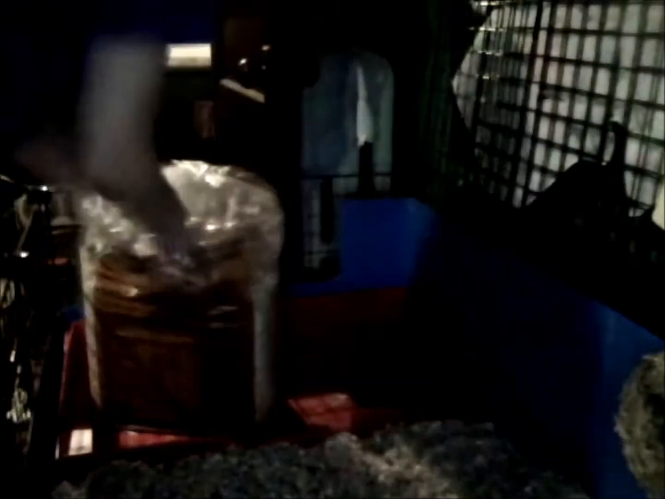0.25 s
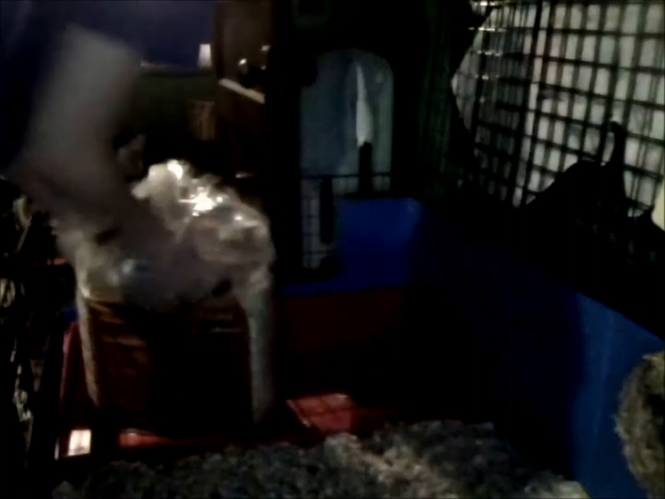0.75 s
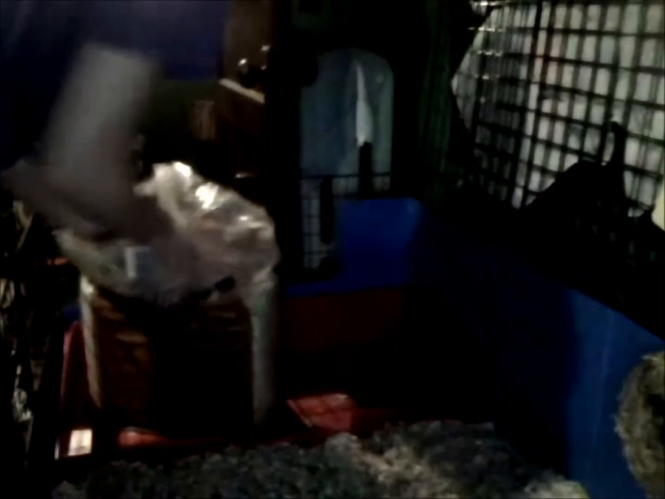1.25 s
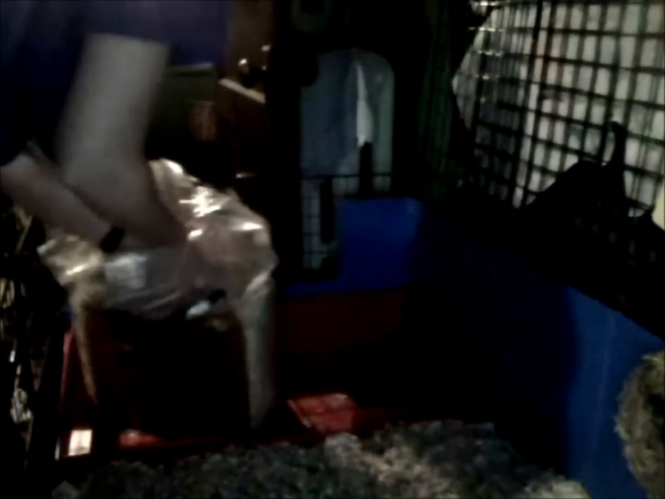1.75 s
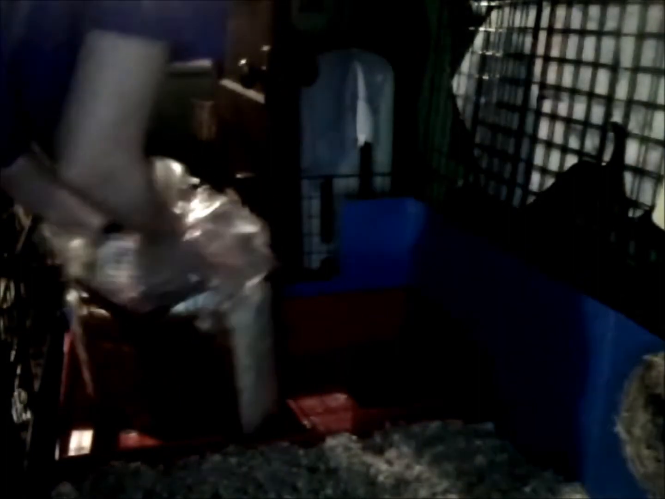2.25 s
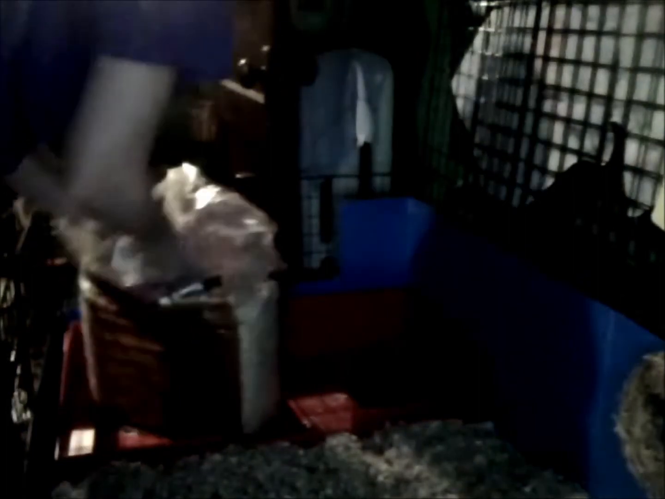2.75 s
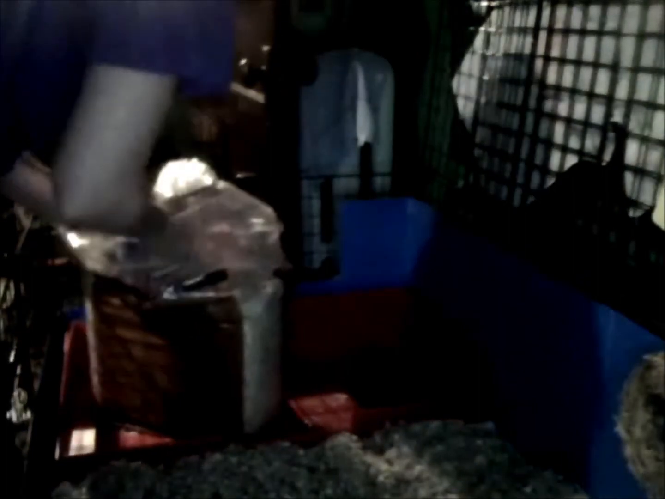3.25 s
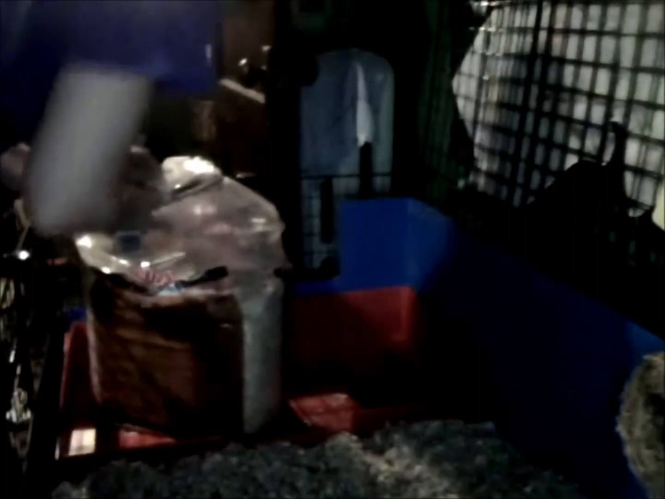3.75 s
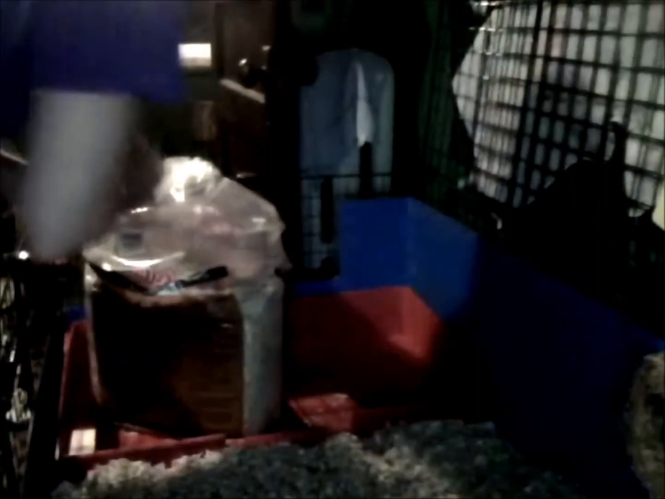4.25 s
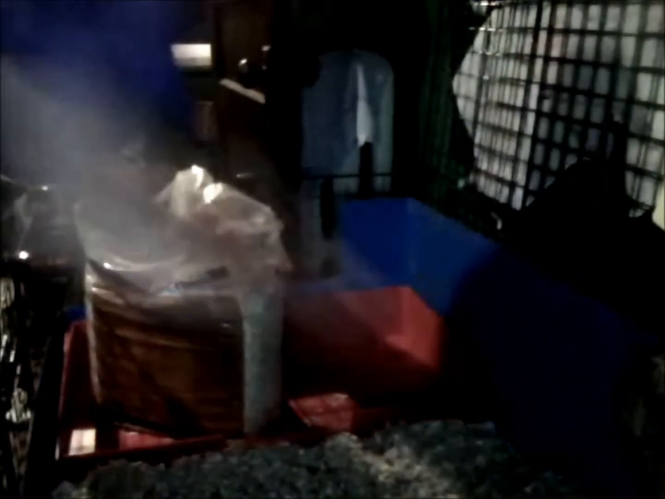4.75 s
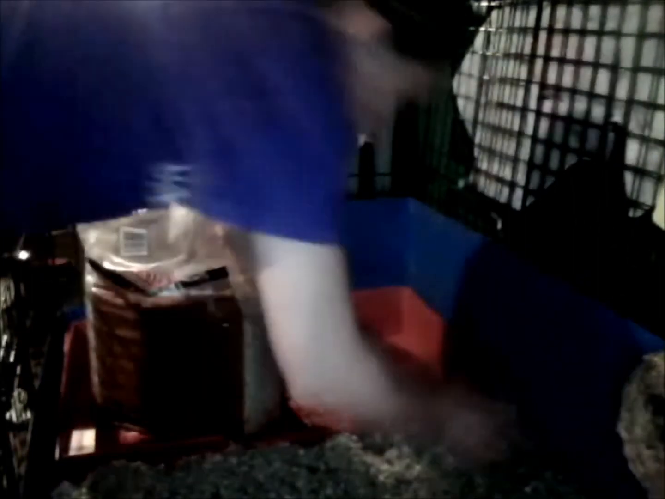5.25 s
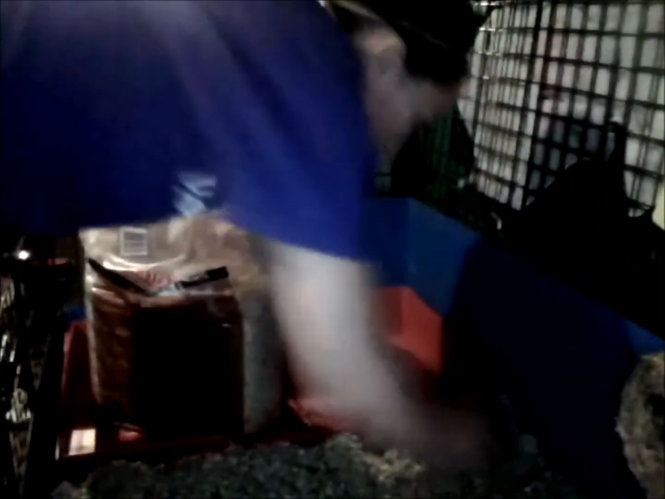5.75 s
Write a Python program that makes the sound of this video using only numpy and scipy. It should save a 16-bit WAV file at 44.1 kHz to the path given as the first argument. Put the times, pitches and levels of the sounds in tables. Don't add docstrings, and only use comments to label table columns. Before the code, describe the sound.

Dry bedding crackles under fingers at once, with a soft low thump of the sack and crisp splinter snaps, loudest at half a second. After 0.8 seconds only sparse faint ticks, slight rustles and a few plastic pops stand over a distant indoor hum. One brief cluster of crunch and hollow knock comes near five seconds. Close, dry, with the highest treble missing.

```python
import sys
import numpy as np
from scipy import signal
from scipy.fft import rfft, irfft
from scipy.io import wavfile
from scipy.ndimage import uniform_filter1d

SR = 44100
rng = np.random.default_rng(int(sys.argv[2]) if len(sys.argv) > 2 else 0)


def dump(signal):
    limited = np.clip(np.atleast_2d(signal).T, -1, 1)
    pcm = np.round(limited * 32767).astype(np.int16)
    wavfile.write(sys.argv[1], SR, pcm)


def linear_from_db(decibels):
    return 10 ** (np.asarray(decibels, float) / 20)


N = 264114
TIME = np.arange(N) / SR

# crest t/s, rustle level/dB, reach/s, heap body rel. level/dB
STROKES = [(.05, -56.5, .2, 1.5), (.3, -44, 0.028, -6), (.34, -47, 0.029, -20), (.485, -38.5, 0.019, -24.5),
           (0.534, -35.5, 0.039, -6), (0.586, -36.5, .025, -20), (.69, -45, .04, -4),
           (.745, -69.5, 0.012, -9), (.85, -60.5, 0.12, -10), (1.1, -66, .1, -17), (1.27, -65, 0.1, 1.5),
           (1.65, -58, 0.097, -4.5), (1.93, -59.5, 0.11, -2.5), (2.35, -63.5, 0.075, 0),
           (2.8, -69.5, .15, -5), (3.25, -70.5, 0.12, -15), (3.56, -65.5, .04, -13.5),
           (3.95, -81, 0.1, -12), (4.23, -66, 0.017, 1), (4.35, -69, 0.12, -2.5), (4.87, -76.5, 0.091, -13),
           (5.08, -57, 0.026, 1.5), (5.16, -65, 0.07, 4.5), (5.355, -63, 0.053, 3),
           (5.49, -63.5, 0.038, -14), (5.7, -62, .02, -7), (5.74, -55.5, 0.022, -9),
           (5.84, -59, 0.033, -11), (5.99, -64.5, 0.036, -13.5)]
# f/Hz, density level/dB per Hz
SLIP_COLOUR = [(700, -25), (1300, 0.5), (2000, 1), (2800, 1.5), (4200, 1), (5600, -0.5), (7000, -2),
               (10000, 0.5)]
# f/Hz, density level/dB per Hz
HEAP_COLOUR = [(40, -28.5), (70, -4), (170, -3.5), (350, -0.5), (700, -1), (1000, 2.5), (1400, -5.5),
               (2200, -4), (3200, -23)]
# crest t/s, level/dB, centre f/Hz, heap body rel. level/dB, squeeze/s
CRUNCHES = [(0.0313, -36.5, 3200, -2.5, .001), (0.036, -35.5, 2860, 4.5, .0044),
            (.097, -36.5, 2980, -7.5, .0063), (.123, -30, 2500, 0.5, .004),
            (.135, -33.5, 4000, -4.5, .0046), (.196, -32.5, 5130, -16.5, .008),
            (.217, -42, 3500, -15, .003), (.348, -39.5, 4020, -2.5, .006), (.393, -33, 4830, -17, .032),
            (.418, -43, 4000, -18, .005), (0.456, -46, 3500, -26.5, .003), (.516, -33, 4600, -5, .026),
            (0.546, -45, 4480, 1.5, .005), (.603, -36, 3500, -14.5, 0.0088), (0.652, -36, 4820, -10, .004),
            (5.095, -32, 2630, -5.5, 0.011), (5.104, -28.5, 2200, -2, .005),
            (5.118, -33, 3500, -2.5, .0063), (5.135, -43.5, 2980, -3.5, .004),
            (5.162, -52, 4500, 0.5, 0.0067), (5.192, -51.5, 2740, -7, .0052)]
# t/s, peak level/dB, ring f/Hz, body rel. level/dB, length/s
LOUD_SNAPS = [(0.0273, -19, 3370, -13, 0.003), (0.0955, -25, 2020, -9, 0.0022),
              (.12, -28, 2910, 4, 0.00073), (0.131, -19, 6100, -11.5, .00068),
              (.19, -15.5, 4400, -32, .0023), (.2, -25, 4200, -27, 0.00093),
              (0.342, -27.5, 1290, -6.5, 0.0025), (.455, -21.5, 2800, -30, .0021),
              (0.4969, -13, 5000, -12.5, .0012), (.4981, -6, 6140, -28, .00087),
              (.5086, -14.5, 5760, -18.5, .0015), (0.5101, -12, 4930, -11, 0.00043),
              (.5985, -15, 4240, -30, 0.00079), (0.624, -26, 2450, -14, 0.0016),
              (0.6503, -11.5, 4720, -16, .00063), (0.7576, -35, 4800, -22, .0014),
              (5.0894, -16, 2620, -2.5, 0.0012), (5.098, -17, 1990, -10.5, 0.00037),
              (5.117, -20, 5940, -8, 0.00092)]
# t/s, peak level/dB, ring f/Hz
FAINT_SNAPS = [(.2618, -41.5, 4750), (.8109, -40.5, 4260), (.9057, -49, 2450), (.9592, -37.5, 2150),
               (1.194, -44, 2040), (1.357, -48, 2820), (1.481, -50, 2540), (1.556, -45, 4070),
               (1.759, -42, 2420), (1.7905, -42, 2690), (1.991, -40.5, 2060), (2.03, -41.5, 2160),
               (2.3237, -44, 4100), (2.358, -42, 5150), (3.4595, -52, 3900), (3.5515, -52, 3000),
               (3.8543, -52, 3090), (3.8736, -53, 2780), (4.2222, -41.5, 2520), (4.292, -41, 2410),
               (4.316, -47, 4400), (4.3698, -49, 5600), (4.4313, -54, 4290), (4.4454, -50, 4920),
               (4.475, -49, 2030), (4.534, -46.5, 2100), (4.9124, -49, 3040), (5.0435, -52, 2050),
               (5.7264, -45, 4530), (5.7833, -47, 2570)]
# (f/Hz, density level/dB per Hz)
FOLD_CLICKS = [
    (0.7176, -20.5, 0.00038, 0.0013, [(1500, -27), (2000, -5.5), (2600, 5.5), (3600, -9), (4800, 1), (6700, -2), (9000, -12.5)]),
    (1.268, -26, 0.0014, 0.0025, [(1700, -23.5), (2600, -0.5), (3200, -11), (4000, 3), (5500, 2), (6600, -2.5), (9000, -22)]),
    (3.487, -24, 0.00013, 0.0018, [(600, -32), (1250, 1), (1800, -25.5), (2400, -2), (2900, -15), (3900, 3.5), (4700, -16), (5600, -5.5), (6900, -2.5), (9000, -8)]),
    (5.2725, -23, 0.0013, 0.002, [(1500, -18), (2150, 3), (3200, -2.5), (4500, -2.5), (5800, -2), (7000, -6.5), (9000, -15)]),
]
# t/s, f/Hz, level/dB, t60/s
POCKETS = [(.1205, 791, -23, 0.038), (.129, 747, -25, 0.023), (.29, 986, -43.5, 0.038),
           (.303, 1000, -37, 0.026), (.345, 1024, -32, .06), (.42, 1880, -35, .02),
           (.5105, 978, -34, 0.016), (.649, 1024, -35, 0.034), (5.089, 900, -27, 0.029),
           (5.101, 153, -33.5, 0.049), (5.104, 800, -23, 0.018)]
# f/Hz, level/dB, t60/s
SACK_MODES = [(214, 2, 0.098), (484, -1, 0.048), (645, -12, 0.067), (840, -20, 0.35)]
# t/s, level/dB
SACK_BLOWS = [
    (0.0278, -32),
    (.006, -43),
    (.019, -40),
    (0.122, -50),
    (.51, -48.5),
    (.6, -43),
]
# f/Hz, density level/dB per Hz
ROOM_COLOUR = [(12, -22.5), (25, -2), (81, -2), (262, -7), (403, -6.5), (500, -6.5), (622, -10.5),
               (760, -8.5), (1000, -14), (1400, -17.5), (2500, -25.5), (7900, -34.5), (8500, -55.5)]
# f/Hz, level/dB
CAMERA_RESPONSE = [(20, -0.5), (6500, -0.5), (7300, -5.5), (8000, -16.5), (8700, -25), (9000, -42),
                   (9300, -80)]

STROKE_EDGE, STROKE_TRAIL = 1.3, 1.05
SETTLING_DB = -81.5
SPRING_BACK_S, SPRING_BACK_SHARE = 0.0031, 1
LOUD_SCATTER_DB, LOUD_BROAD_DB = -11.5, -7
FAINT_BODY_DB, FAINT_LENGTH_S, FAINT_SCATTER_DB, FAINT_BROAD_DB = -14, 0.001, -8, -11
SNAP_SAMPLES, CLICK_SAMPLES, BOOM_SAMPLES = 2600, 1800, 9000
CLICK_LEAD_S = 0.006
ROOM_DB = -55.5


def unit(x):
    return x / np.sqrt(np.mean(x ** 2))


def shape(x, points):
    hz, db = np.transpose(points)
    grid = np.log(np.arange(len(x) // 2 + 1) * SR / len(x) + 1)
    gain = linear_from_db(np.interp(grid, np.log(hz), db, -80, -80))
    return irfft(rfft(x) * gain, len(x))


def colour(x, points):
    return unit(shape(x, points))


def band(x, hz, q):
    b, a = signal.iirpeak(hz, max(q, .3), fs=SR)
    return signal.lfilter(b, a, x)


def walk(rate):
    hold = int(SR / rate)
    steps = np.repeat(rng.standard_normal(N // hold + 1), hold)
    slewed = uniform_filter1d(uniform_filter1d(steps, hold), hold)
    return unit(slewed[:N])


def even(burst):
    lines = rfft(burst)
    power = uniform_filter1d(abs(lines) ** 2, size=17)
    return irfft(lines / np.sqrt(power), len(burst))


def slips(per_s, spread_db, smear_s):
    happens = rng.random(N) < per_s / SR
    sizes = happens * linear_from_db(spread_db * rng.exponential(size=N).clip(0, 3.2))
    burst = signal.lfilter([1], [1, -np.exp(-1 / (smear_s * SR))], sizes)
    return unit(burst * rng.standard_normal(N))


def shavings():
    total = np.zeros(N)
    for hz in (1200, 2200, 3500, 5100, 7600):
        curls = band(slips(2200, spread_db=2.0, smear_s=0.00095), hz, 1.5)
        total += curls * linear_from_db(2.0 * walk(30))
    return unit(total)


def heap_body():
    return colour(slips(700, spread_db=4.5, smear_s=0.0058), HEAP_COLOUR)


def rustle(bright, body):
    s, rustle_db, reach, body_db = np.transpose(STROKES)[:, :, None]
    away = np.where(TIME < s, s - TIME, (TIME - s) / STROKE_TRAIL) / reach
    effort = linear_from_db(rustle_db) * np.exp(-away ** STROKE_EDGE)
    top = effort.sum(axis=0) + linear_from_db(SETTLING_DB)
    low = (effort * linear_from_db(body_db)).sum(axis=0)
    patches = linear_from_db(1.55 * walk(40))
    return patches * (top * bright + low * body)


def crunches(grains, body):
    out = np.zeros(N)
    for s, db, hz, body_db, rise in CRUNCHES:
        fall = SPRING_BACK_S + SPRING_BACK_SHARE * rise
        near = slice(max(int((s - .1) * SR), 0), int((s + .2) * SR))
        t = TIME[near] - s
        swell = np.exp(np.where(t < 0, -(t / rise) ** 2, -t / fall))
        wad = unit(band(grains[near], hz, 0.97)) + linear_from_db(body_db) * body[near]
        out[near] += linear_from_db(db) * swell * wad
    return out


def snap(db, hz, body_db, length, scatter_db, broad_db):
    t = TIME[:SNAP_SAMPLES]
    crack, haze = rng.standard_normal((2, len(t)))
    crack = crack + 3.2 * (t == TIME[3])
    crack = even(crack * np.exp(-t / length)) * np.exp(-t / .006)
    thin = signal.butter(4, 1900, "high", fs=SR, output="sos")
    top = signal.sosfilt(thin, band(crack, hz, 4.5) + linear_from_db(broad_db) * band(crack, 3400, .7))
    low = band(band(crack, 1000, 1.8), 1000, 1.8)
    haze = signal.sosfilt(thin, band(haze, 5200, 0.67))
    haze = haze * np.exp(-t / 0.004) * np.minimum(t / 0.0017, 1)
    return linear_from_db(db) * (top / abs(top).max() + linear_from_db(body_db) * low / abs(low).max() + linear_from_db(scatter_db) * haze)


def snaps():
    out = np.zeros(N + SNAP_SAMPLES)
    loud = [(*row, LOUD_SCATTER_DB, LOUD_BROAD_DB) for row in LOUD_SNAPS]
    faint = [(*row, FAINT_BODY_DB, FAINT_LENGTH_S, FAINT_SCATTER_DB, FAINT_BROAD_DB) for row in FAINT_SNAPS]
    for s, *row in loud + faint:
        start = int(s * SR)
        out[start:start + SNAP_SAMPLES] += snap(*row)
    return out[:N]


def clicks():
    out = np.zeros(N)
    t = TIME[:CLICK_SAMPLES] - CLICK_LEAD_S
    for s, db, rise, fall, fold in FOLD_CLICKS:
        rattle, again = rng.standard_normal((2, len(t)))
        swell = np.exp(np.where(t < 0, t / rise, -t / fall))
        pop = colour(even(rattle * swell), fold)
        pop = pop * np.exp(t.clip(None, 0) / rise)
        echo = colour(again, fold) * np.exp(-((t - .008) / 0.0066) ** 2)
        start = int((s - CLICK_LEAD_S) * SR)
        out[start:start + len(t)] += linear_from_db(db) * (pop / abs(pop).max() + linear_from_db(-28.0) * echo)
    return out


def pockets():
    out = np.zeros(N)
    for s, hz, db, t60 in POCKETS:
        age = (TIME - s).clip(0)
        out += linear_from_db(db) * np.sin(2 * np.pi * hz * age) * 1000. ** (-age / t60)
    return out


def sack():
    out = np.zeros(N + BOOM_SAMPLES)
    t = TIME[:BOOM_SAMPLES]
    boom = sum(linear_from_db(db) * np.sin(2 * np.pi * hz * t) * 1000. ** (-t / t60) for hz, db, t60 in SACK_MODES)
    for s, db in SACK_BLOWS:
        start = int(s * SR)
        out[start:start + BOOM_SAMPLES] += linear_from_db(db) * boom
    return out[:N]


def room():
    level_db = ROOM_DB + .5 * walk(1.5) + 0.51 * walk(12)
    return linear_from_db(level_db) * colour(rng.standard_normal(N), ROOM_COLOUR)


def scene():
    grains = shavings()
    body = heap_body()
    digging = rustle(colour(grains, SLIP_COLOUR), body) + crunches(grains, body) + snaps()
    mix = digging + clicks() + pockets() + sack() + room()
    return mix[None]


def band_limit(x):
    return signal.sosfilt(signal.butter(12, 15600, fs=SR, output="sos"), x)


def record(dry):
    hiss = linear_from_db(-96) * rng.standard_normal(dry.shape)
    heard = shape(dry[0], CAMERA_RESPONSE)[None] + hiss
    return band_limit(heard)


dry = scene()
out = record(dry)
dump(out)
```